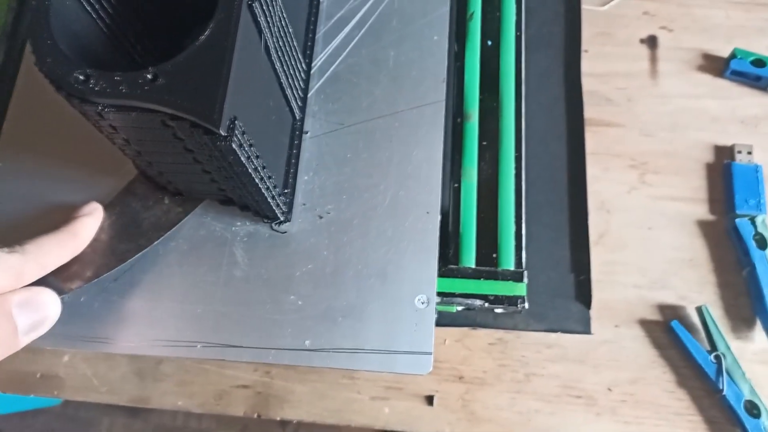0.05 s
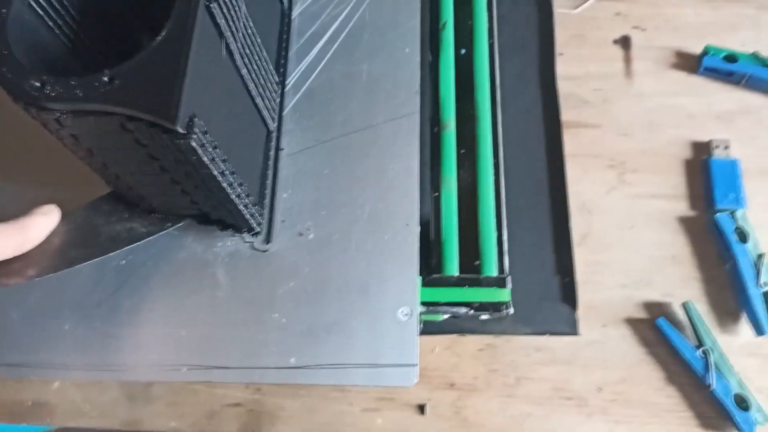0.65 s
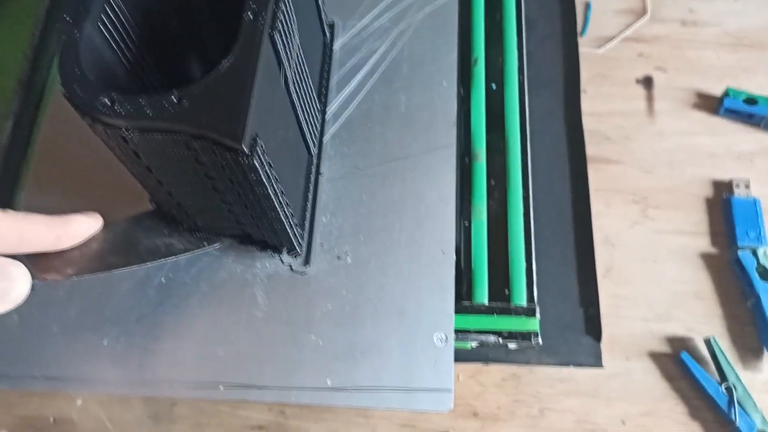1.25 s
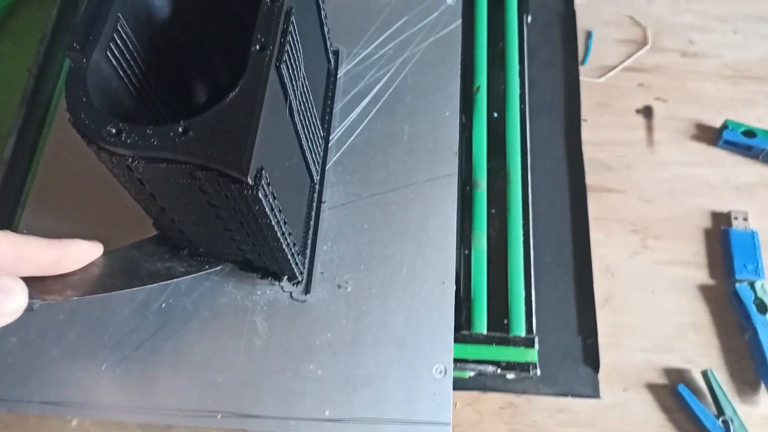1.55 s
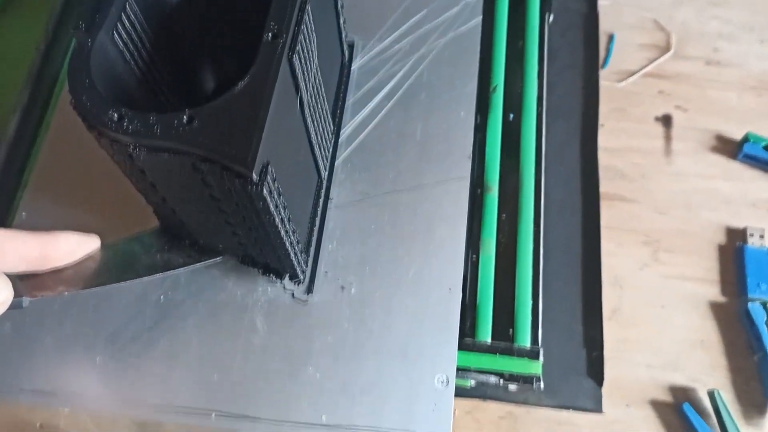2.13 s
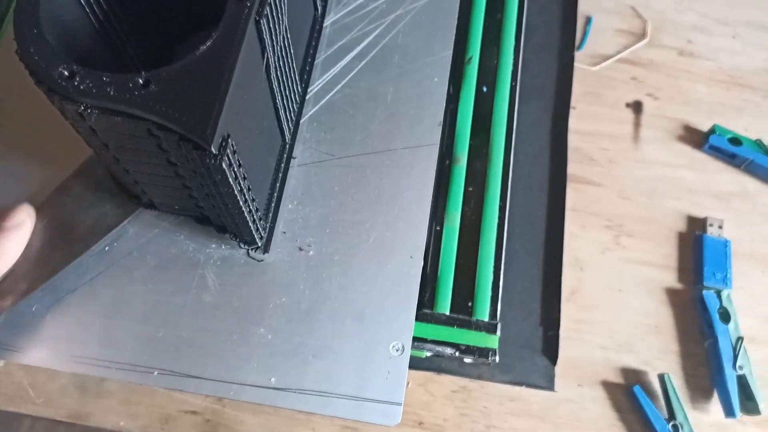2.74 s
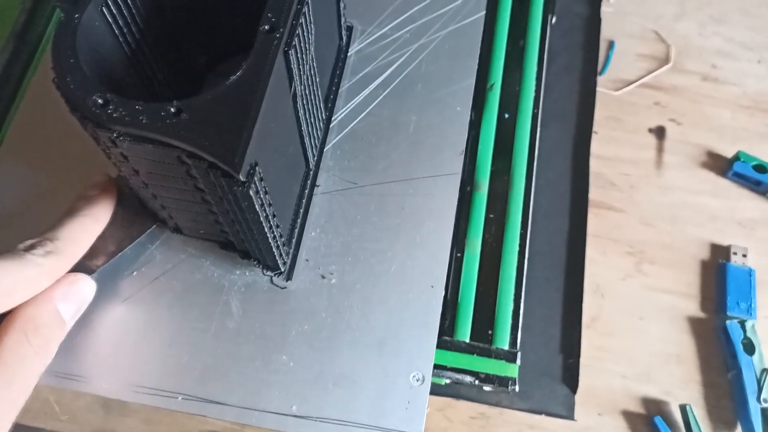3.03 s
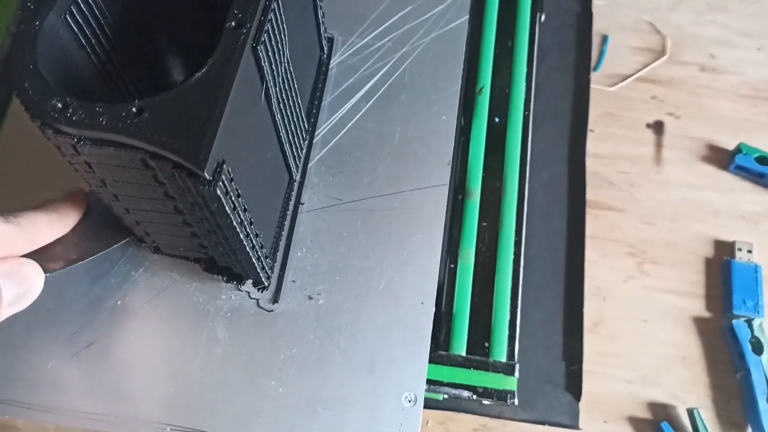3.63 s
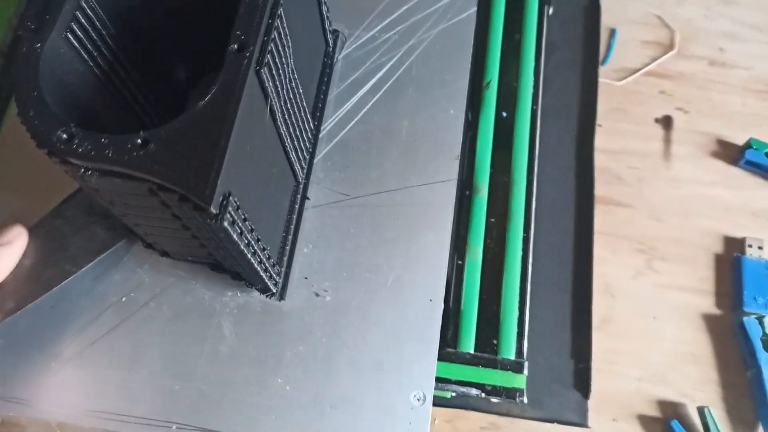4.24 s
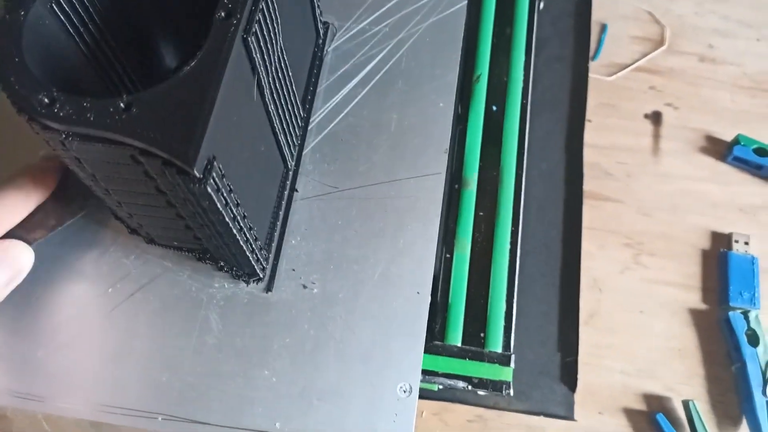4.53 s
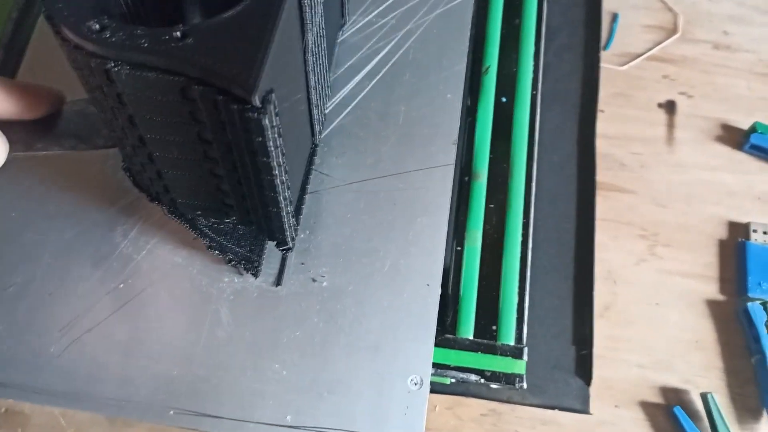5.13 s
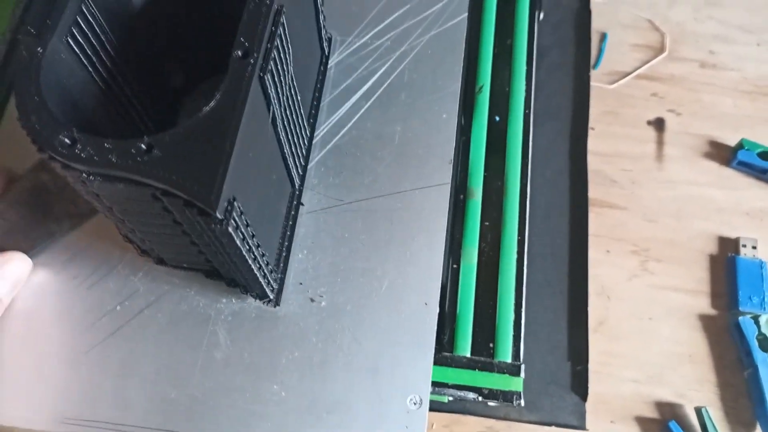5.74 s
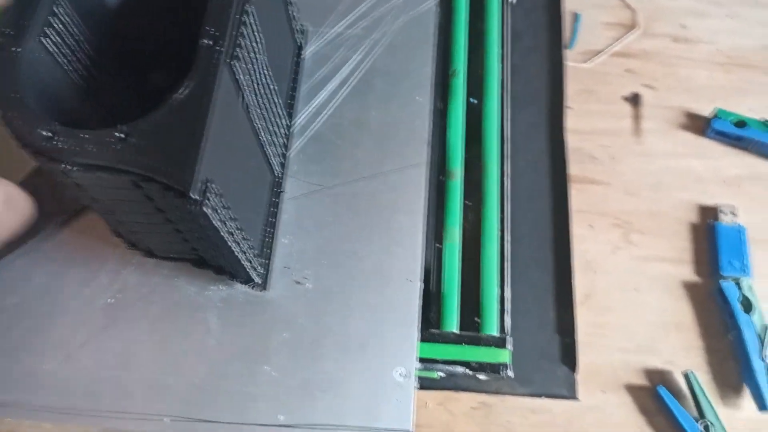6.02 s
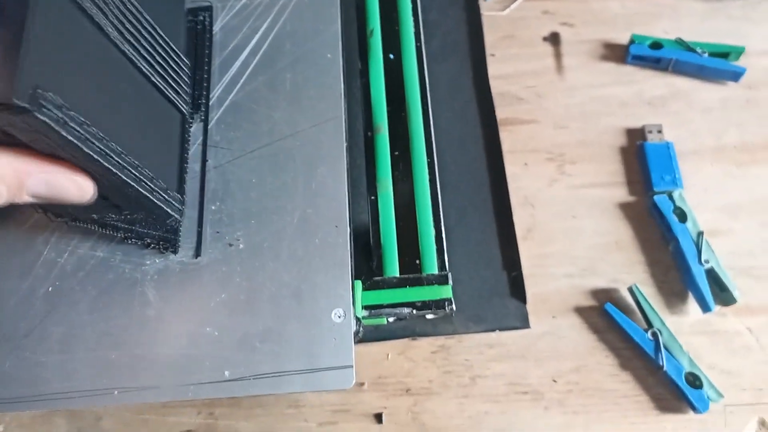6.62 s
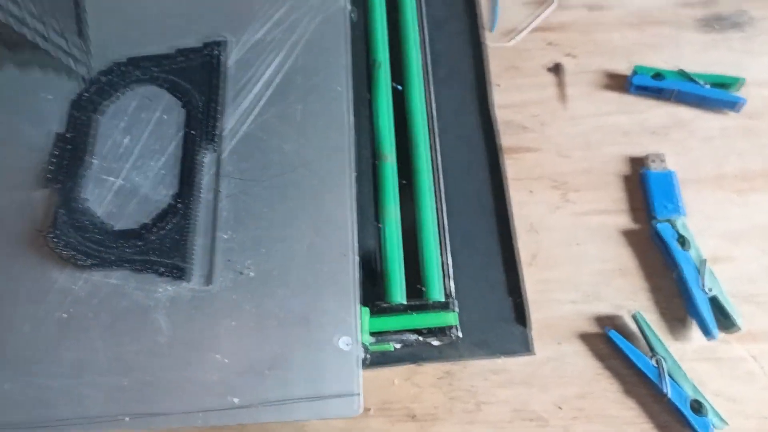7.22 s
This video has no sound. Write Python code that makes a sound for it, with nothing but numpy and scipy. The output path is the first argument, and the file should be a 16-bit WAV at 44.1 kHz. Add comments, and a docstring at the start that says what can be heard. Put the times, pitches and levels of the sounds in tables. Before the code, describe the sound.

Close up in a small room, hard plastic snaps and crackles in irregular bursts as it is levered off a metal plate. The plate knocks on a wooden bench early on, and short pings and soft scraping strokes of a steel blade fall between the cracks. Near the end a dense run of cracking frees the part, followed by a thumping metallic clatter.

```python
"""A hollow plastic part is pried off a metal plate on a wooden bench with a steel scraper, close up in
a small room. Over a fading low hum and soft taps, the bond cracks and tears, the bent plate springs
flat and knocks on the bench, and a noisy wash dies away. More cracks ring the part; the blade pings.
From 2.5 s the blade slides in strokes between cracks and tears; near 5.8 s it chatters on the plate.
From 6.3 s the cracks crowd in as a hand pulls the part free, and after 7 s the plate clatters down."""
import sys
import numpy as np
from scipy import signal
from scipy.fft import rfft, irfft, next_fast_len
from scipy.io import wavfile
from scipy.ndimage import map_coordinates

SR = 44100
rng = np.random.default_rng(int(sys.argv[2]) if len(sys.argv) > 2 else 0)


def put_to_file(sound):
    """Save the sound as 16-bit audio at rate SR, in the file named by the first command-line argument."""
    columns = np.atleast_2d(sound).T  # one column per channel
    safe = np.clip(columns, -1, 1)
    whole_steps = np.round(safe * 32767)
    wavfile.write(sys.argv[1], SR, whole_steps.astype(np.int16))


N = 329427

# single cracks of the bond, and at 5.884 s a bright clack of the scraper on the plate: t/s, body/dB, bright/dB
BOND_CRACKS = [(0.164, -40.5, -32.5), (0.361, -55, -61), (0.419, -29, -18.5), (.425, -18.5, -17),
               (.531, -40, -20), (1.104, -58.5, -61), (1.506, -52, -54.5), (1.679, -24.5, -13),
               (1.688, -41, -19.5), (1.711, -23.5, -11.5), (1.721, -26, -21), (1.754, -38, -18),
               (1.773, -53, -16), (1.867, -35.5, -17), (1.944, -21.5, -15.5), (1.986, -53, -20),
               (2.087, -72, -30), (2.202, -34, -21), (2.221, -31.5, -23), (2.327, -32, -49),
               (2.333, -44.5, -25.5), (2.368, -66, -36), (2.912, -38, -34), (3.343, -41, -26),
               (3.352, -35, -18), (3.445, -61, -45), (3.513, -35.5, -16.5), (3.58, -35.5, -35),
               (3.608, -36, -13.5), (3.674, -27, -18), (3.711, -19.5, -15), (3.75, -21.5, -14),
               (4.098, -47, -33.5), (4.166, -32, -15.5), (4.187, -35, -22), (4.207, -32, -16.5),
               (4.217, -61, -17.5), (4.274, -32.5, -22.5), (4.326, -35.5, -17.5), (4.445, -39, -24.5),
               (4.569, -36.5, -29), (4.862, -38, -31), (4.877, -34.5, -36), (4.895, -53, -24),
               (4.924, -28, -52), (4.934, -33.5, -16), (4.968, -32.5, -13.5), (4.976, -37, -23),
               (4.985, -26, -14.5), (4.999, -45, -16), (5.008, -37, -17), (5.033, -30, -15),
               (5.05, -37, -19), (5.063, -33, -27), (5.073, -29, -27), (5.082, -27, -17), (5.094, -43, -21),
               (5.111, -38.5, -18), (5.231, -67, -39), (5.286, -45, -34.5), (5.355, -30.5, -21),
               (5.366, -77, -20), (5.849, -32, -52), (5.884, -22.5, -27), (6.283, -24.5, -13),
               (6.391, -59, -31), (6.411, -37.5, -18), (6.454, -33.5, -12), (6.465, -37.5, -21),
               (6.645, -39.5, -29), (6.657, -28, -12.5), (6.687, -28, -8.5), (6.703, -34, -11.5),
               (6.75, -40, -15), (6.777, -38.5, -14), (6.855, -37, -18), (6.917, -37, -15.5),
               (6.929, -24, -18.5), (6.958, -40, -25), (6.973, -32, -14.5), (6.983, -26, -13.5),
               (7.01, -24.5, -16), (7.03, -23, -11), (7.075, -26, -13.5), (7.089, -35, -14),
               (7.158, -35, -22), (7.225, -27, -22)]
# likeness of the two channels: f/Hz, correlation
STEREO_CORRELATION = [(30, 0.27), (100, 1), (300, 0.64), (600, 0.97), (1100, 0.25), (5000, 0),
                      (12000, 0.04)]


def amp(db):
    """Decibels to gain."""
    return 10 ** (np.asarray(db) / 20)


def unit(x):
    """Scale to rms 1."""
    return x / np.sqrt(np.mean(x ** 2) + 1e-20)


def along(points, hz):
    """Read (f/Hz, value) points on a log axis."""
    f_hz, values = np.transpose(points)
    return np.interp(np.log(hz + 1), np.log(f_hz), values)


def fade(t60_s, count=SR):
    """Exponential decay, count samples long."""
    return np.exp(-np.log(1000) * np.arange(count) / SR / t60_s)


def add(track, t_s, sound):
    """Mix a sound into a track at t_s."""
    part = track[..., max(round(t_s * SR), 0):][..., :sound.shape[-1]]
    part += sound[..., :part.shape[-1]]


def filtered(x, response):
    """Apply a gain given as a function of f/Hz."""
    size = next_fast_len(N + 8192)
    return irfft(rfft(x, size) * response(np.fft.rfftfreq(size, 1 / SR)), size)[..., :N]


def stereo_gains(hz):
    """Left and right gain of the work place, at constant power."""
    # balance: f/Hz, left minus right/dB
    balance = [(50, -7.5), (120, 0.5), (400, 0.5), (700, 1.5), (1300, -4.5), (2400, -4), (4400, 5),
               (6500, 5), (9000, 6), (12000, -17.5), (15000, -1.5)]
    ratio = amp(along(balance, hz))
    return np.array([ratio, np.ones_like(ratio)]) * np.sqrt(2 / (1 + ratio ** 2))


def stereo_angle(hz):
    """Mid-side angle in radians for the channel correlation."""
    return np.arccos(np.clip(along(STEREO_CORRELATION, hz), -1, 1)) / 2


def noise(spectrum, band_hz=(0, SR), ripple_db=0, spacing_hz=130, shifts_per_s=11):
    """Coloured stereo noise, rms 1; crowded, shifting resonances ripple its spectrum."""
    hz, t_s, bins = signal.stft(rng.standard_normal((2, N)), SR, nperseg=1024)
    grid = np.meshgrid(hz / spacing_hz, t_s * shifts_per_s, indexing="ij")
    ripple = map_coordinates(rng.standard_normal((512, 256)), grid, order=1, mode="mirror")
    angle = stereo_angle(hz)
    mid, side = bins * amp(ripple_db * ripple) * np.array([np.cos(angle), np.sin(angle)])[..., None]
    pair = signal.istft(np.array([mid + side, mid - side]), SR, nperseg=1024)[1][:, :N]
    low_hz, high_hz = band_hz
    return unit(filtered(
        pair, lambda f: amp(along(spectrum, f)) * stereo_gains(f) * (f >= low_hz) * (f < high_hz)))


def ring(modes, scatter_db, detune=0):
    """Struck modes of random strength and tuning; the high ones reach the microphones out of step."""
    count = int(SR * np.clip(max(t60_s for _, _, t60_s in modes), .05, 1))
    t_s, out = np.arange(count) / SR, np.zeros((2, count))
    for hz, db, t60_s in modes:
        phase = rng.normal() * stereo_angle(hz)
        tuned_hz = hz * (1 + detune * rng.normal())
        wave = np.sin(2 * np.pi * tuned_hz * t_s + np.array([[phase], [-phase]]))
        out += stereo_gains(hz)[:, None] * amp(db + scatter_db * rng.normal()) * wave * fade(t60_s, count)
    attack = 1 - fade(0.0076, count)
    return out * attack * np.sqrt(2 / sum(amp(db) ** 2 for _, db, _ in modes))


def grain(rate_hz, depth_db):
    """Spiky random gain, rms 1."""
    wander = np.interp(np.arange(N) / SR * rate_hz, np.arange(N // 8), rng.standard_normal(N // 8))
    return unit(amp(depth_db * wander))


def background(air_db=-60):
    """Quiet room air, a low hum that wavers and fades, a few dull taps."""
    # hum: t/s, f/Hz, level/dB
    hum_track = [(0, 80, -47), (.11, 80.3, -56), (.19, 84.5, -47.5), (.34, 81.4, -59), (.75, 92.6, -68),
                 (.86, 92.2, -61), (1.18, 91.6, -61), (1.3, 95.6, -89)]
    # air: f/Hz, relative density/dB
    air_spectrum = [(15, -52), (25, -17), (108, -4.5), (344, -13), (840, -20.5), (1070, -21.5),
                    (1400, -22.5), (1610, -24), (2690, -21.5), (2910, -25), (5280, -34), (6380, -28.5),
                    (9840, -40), (12200, -27.5), (16000, -49.5)]
    # taps: t/s, level/dB
    taps = [(.005, -51), (.1, -44), (0.265, -46), (.747, -45), (.855, -50), (0.977, -48), (1.508, -48.5),
            (4.82, -45)]
    # ring of a tap: f/Hz, relative level/dB, t60/s
    tap_modes = [(233, -3.5, 0.11), (369, -2.5, 0.14), (410, 0.5, 0.046)]
    t_s = np.arange(N) / SR
    knots_s, hum_hz, hum_db = np.transpose(hum_track)
    phase = 2 * np.pi * np.cumsum(np.interp(t_s, knots_s, hum_hz)) / SR
    hum = np.sqrt(2) * amp(np.interp(t_s, knots_s, hum_db, right=-120)) * np.sin(phase)
    out = amp(air_db) * noise(air_spectrum) + hum
    for tap_s, db in taps:
        add(out, tap_s, amp(db) * ring(tap_modes, scatter_db=2, detune=.05))
    return out


def band_db(body_db, bright_db, band):
    """Level of a burst in band 0 (lowest) to 3."""
    # weight per band: 0 = body level, 1 = bright level
    bright_share = [0, .4, .6, 1]
    return body_db + bright_share[band] * (bright_db - body_db)


def bursts():
    """Cracks, contacts and runs as noise bursts that die fast. Returns direct, room send."""
    # bands: low f/Hz, high f/Hz
    bands_hz = [(350, 1800), (1800, 4000), (4000, 10000), (10000, 17000)]
    # burst per band: t60/s, gain/dB, room send/dB
    damping = [(0.03, -2.5, -6), (0.054, -5, -5.5), (0.034, -3, -10), (0.014, 0, -17)]
    # burst colour: f/Hz, relative density/dB
    spectrum = [(300, -10.5), (520, 1), (680, 3.5), (860, 3), (1250, 0), (1700, -4.5), (2400, 3),
                (3100, 1.5), (3900, -4), (5000, -4.5), (6500, 0), (8000, -5.5), (11000, -8), (12200, 3),
                (14000, -10), (16000, -14.5)]
    events = list(BOND_CRACKS) + aftershocks() + contacts() + burst_runs()
    direct, to_room = np.zeros((2, N)), np.zeros((2, N))
    for band, (t60_s, gain_db, room_db) in enumerate(damping):
        burst = (fade(t60_s, SR // 8) * (1 - fade(0.0082, SR // 8))) ** 2
        burst /= burst[:SR // 200].mean()  # unit power over the first 5 ms
        power = np.zeros(N)
        for t_s, body_db, bright_db in events:
            add(power, t_s, amp(band_db(body_db, bright_db, band) + gain_db) ** 2 * burst)
        jerks = grain(rate_hz=bands_hz[band][0] / 5, depth_db=3)  # a break advances unevenly
        sound = np.sqrt(power) * jerks * noise(spectrum, bands_hz[band], ripple_db=7.5, spacing_hz=100.23)
        direct += sound
        to_room += amp(room_db) * sound
    return direct, to_room


def after_ring(ring_db=-15):
    """Ring after each crack and contact: the part's modes, plus high microphone resonances."""
    # hollow part below 6 kHz, microphone above: f/Hz, relative level/dB, t60/s
    modes = [(797, -8, 0.9), (1195, 16.5, 0.13), (2162, 20, 0.18), (2500, -12.5, 0.27), (2550, 10, 0.21),
             (2950, -0.5, 0.11), (3366, 14.5, 0.1), (4850, -7.5, 0.093), (6460, -8.5, 0.072),
             (11500, -7.5, 0.15), (12800, -16.5, 0.074)]
    out = np.zeros((2, N))
    for t_s, body_db, bright_db in list(BOND_CRACKS) + contacts():
        gain = amp(band_db(body_db, bright_db, 1) + ring_db)
        add(out, t_s, gain * ring(modes, scatter_db=6, detune=.035))
    return out


def knocks(boom_db=-14, kick_ring_db=-17.5, thump_t60_s=0.083, jolt_t60_s=0.035):
    """The plate drops or is kicked by a crack: a dull thump, the bench's boom, the plate's ring."""
    # a crack kicks harder as the plate loosens: t/s, thump re body level/dB
    kick_thump = [(1.7, -13), (3.4, -10.5), (4.2, -4), (5.1, -8), (6.3, -6), (6.7, -6.5)]
    # wooden bench: f/Hz, relative level/dB, t60/s
    bench_modes = [(115.6, 0, 0.88), (160.8, 3, 0.74), (212, -3.5, 0.79), (246.6, -5.5, 1),
                   (297, 1.5, 0.38)]
    # metal plate: f/Hz, relative level/dB, t60/s
    plate_modes = [(406, -3.5, 0.52), (534, -9, 0.93), (619, -8.5, 0.37), (699, 4.5, 0.22),
                   (780, -18.5, 0.17), (940, -16, 0.083), (1199, 3, 0.37), (1390, -4, 0.38),
                   (1910, 3, 0.11), (2600, 6.5, 0.17), (2560, -5, .16), (3190, -4.5, 0.51),
                   (4580, 7, 0.091), (5950, -13.5, .18), (7300, -20.5, .12)]
    # the bent plate springs flat: t/s, f/Hz, level/dB
    jolts = [(0.419, 82, -23.5), (.441, 86, -12.5), (0.488, 150.4, -6.5), (.495, 251.3, -12),
             (3.751, 86.5, -25)]
    # thump: f/Hz, relative density/dB
    thump_spectrum = [(25, -31.5), (55, -13.5), (105, -0.5), (240, -1), (400, -3.5), (900, -35.5),
                      (2000, -96.5)]
    kicks = [(t_s, body_db + np.interp(t_s, *np.transpose(kick_thump)), body_db + kick_ring_db)
             for t_s, body_db, _ in BOND_CRACKS]
    push, rings = np.zeros(N), np.zeros((2, N))
    for t_s, thump_db, plate_db, *_ in kicks + bounces():
        add(push, t_s, amp(thump_db) * fade(thump_t60_s) * (1 - fade(0.048)))
        add(rings, t_s, amp(thump_db + boom_db) * ring(bench_modes, scatter_db=2, detune=.02))
        add(rings, t_s, amp(plate_db) * ring(plate_modes, scatter_db=0, detune=0.0058))
    pan = amp([[-16.5], [0]])  # jolts reach mostly the right microphone
    for t_s, hz, db in jolts:
        jolt = np.sin(2 * np.pi * hz * np.arange(SR) / SR) * fade(jolt_t60_s)
        add(rings, t_s, amp(db) * pan / pan.mean() * jolt)
    return push * noise(thump_spectrum) + rings


def pings(ref_t60_s=0.065, ref_hz=2480):
    """Flicked steel springs back and rings briefly; lower pings last longer."""
    # flicks of the blade or the plate's edge: t/s, f/Hz, level/dB
    flicks = [(.165, 824, -36.5), (.165, 2690, -35.5), (.443, 509, -26.5), (0.503, 892, -25.5),
              (1.679, 2850, -21), (1.868, 2550, -16), (1.868, 2250, -25), (1.943, 2600, -21),
              (1.988, 2300, -37), (2.088, 2370, -38), (2.842, 496, -36), (3.352, 1385, -33.5),
              (3.352, 547, -40), (3.515, 2680, -25), (3.515, 2972, -33), (3.606, 2246, -28.5),
              (3.71, 2196, -19), (4.1, 2230, -34.5), (4.161, 2540, -25.5), (5.425, 818, -37),
              (5.665, 640, -32), (6.412, 2120, -29.5), (6.856, 2140, -34.5), (7.166, 807, -17.5),
              (7.264, 750, -24), (7.327, 788, -23)]
    out = np.zeros((2, N))
    for t_s, hz, db in flicks:
        t60_s = ref_t60_s * (ref_hz / hz) ** 0.61
        add(out, t_s, amp(db) * ring([(hz, 0, t60_s)], scatter_db=4.5))
    return out


def aftershocks(mean_wait_s=.011, gain_db=-16):
    """The bond gives a little more just after each crack. Rows: t/s, body/dB, bright/dB."""
    waits_s = mean_wait_s * (.5 + rng.random(len(BOND_CRACKS)))
    return [(t_s + wait_s, body_db + gain_db, bright_db + gain_db)
            for (t_s, body_db, bright_db), wait_s in zip(BOND_CRACKS, waits_s)]


def burst_runs(spread_db=6.5, gain_db=0.5, even_above_hz=300, max_bursts=128):
    """Dense runs of tiny bursts, more even when faster. Rows: t/s, body/dB, bright/dB."""
    # 0.522-0.628 s: a noisy wash dying away after the first big break; the rest: tearing or rattling
    # start/s, end/s, burst rate/Hz, body/dB, bright/dB, fall over the run/dB
    runs = [(0.435, 0.519, 605, -25.5, -22.5, 1.5), (0.522, 0.628, 900, -32.5, -29, 13.5),
            (1.702, 1.776, 430, -29, -33.5, 16), (3.67, 3.756, 540, -32.5, -27, 4),
            (3.744, 3.853, 485, -28, -19.5, 18.5), (4.825, 4.931, 117, -56, -46, -12.5),
            (4.956, 5.12, 275, -38, -29, 16), (5.147, 5.352, 205, -68.5, -66.5, -20.5),
            (5.359, 5.44, 440, -42, -39.5, 7), (5.611, 5.821, 600, -53, -69, -2),
            (5.887, 5.983, 350, -41.5, -67, -1), (6.293, 6.517, 300, -78, -55.5, -10),
            (6.955, 7.031, 240, -44, -30, -2), (7.025, 7.092, 580, -38.5, -25, 3.5),
            (7.146, 7.28, 500, -31.5, -51.5, 3), (7.285, 7.331, 600, -22.5, -38, 1.5),
            (7.349, 7.443, 470, -32, -69, 5)]
    rows = []
    for start_s, end_s, rate_hz, body_db, bright_db, fall_db in runs:
        jitter, size = rng.random(max_bursts), rng.standard_normal(max_bursts)
        evenness = np.sqrt(max(rate_hz / even_above_hz, 1))
        count = int(np.clip((end_s - start_s) * rate_hz, 2, max_bursts))
        progress = (np.arange(count) + jitter[:count]) / count
        strength = unit(amp(spread_db / evenness * size[:count]))
        size_db = 20 * np.log10(strength) + gain_db - fall_db * progress
        rows += zip(start_s + (end_s - start_s) * progress, body_db + size_db, bright_db + size_db)
    return rows


def bounces(count=4, gap_s=.035):
    """Each drop repeats evenly, weaker each time. Rows: t/s, thump/dB, plate ring/dB, contact/dB."""
    # plate on bench, or loose part on plate: t/s, thump/dB, plate ring/dB, contact/dB, loss per bounce/dB
    drops = [(0.443, -18, -29.5, -23, 24), (0.486, -25, -41, -27, 20), (1.715, -43, -34, -24, 8),
             (1.942, -33, -39, -13, 14), (2.84, -37.5, -47, -27.5, 9.5), (3.75, -24, -42, -28, 19),
             (4.17, -49, -43, -52, 13), (4.208, -43, -49, -41, 14.5), (4.426, -52, -54, -37, 21),
             (5.286, -26, -47, -38.5, 8), (5.391, -40, -38, -32, 6), (5.602, -29, -63, -24, 12),
             (5.664, -26, -37.5, -33.5, 10.5), (5.834, -36, -35.5, -26, 14.5),
             (5.884, -40, -30.5, -20.5, 8), (7.075, -18.5, -36, -42, 3), (7.159, -10.5, -30.5, -11, 3.5),
             (7.298, -15.5, -29, -15, 11), (7.328, -18, -30, -16, 24), (7.409, -28, -30, -25.5, 16)]
    return [(t_s + k * gap_s, thump_db - k * loss_db, plate_db - k * loss_db, contact_db - k * loss_db)
            for t_s, thump_db, plate_db, contact_db, loss_db in drops for k in range(count)]


def contacts(treble_db=-19.5):
    """The clack of each bounce, duller than a crack. Rows: t/s, body/dB, bright/dB."""
    return [(t_s, db, db + treble_db) for t_s, _, _, db in bounces()]


def stroke(start_s, peak_s, end_s, db):
    """Gain of one push of the blade: it swells and fades."""
    return amp(db) * np.interp(np.arange(N) / SR, [start_s, peak_s, end_s], [0, 1, 0]) ** 1.5


def scraping(rasp_db=-2):
    """The blade rasps under the part, catching on fine ridges and coarser lumps."""
    # pushes of the blade: start/s, peak/s, end/s, level/dB
    strokes = [(2.45, 2.63, 2.72, -50), (2.684, 2.862, 3.15, -40.5), (4.327, 4.524, 4.74, -38.5),
               (5.531, 5.603, 5.63, -27.5), (6.216, 6.271, 6.3, -38.5)]
    # rasp: f/Hz, relative density/dB
    rasp_spectrum = [(240, -34), (400, -7.5), (839, 7), (1070, -5), (1420, -1.5), (1560, -11), (2510, 3),
                     (2750, -3), (3260, -1.5), (5520, -5), (9470, -9.5), (12500, 3.5), (16000, -13.5)]
    # silent layer, gain zero as its end precedes its start: start/s, peak/s, end/s, level/dB
    silent_stroke = (5.52, 5.575, 5.5, -46)
    # its narrow band at 5.25 kHz: f/Hz, relative density/dB
    silent_spectrum = [(4700, -50), (5250, 0), (5800, -45)]
    push = sum(stroke(*row) for row in strokes)
    catching = grain(rate_hz=870, depth_db=2.5) * grain(rate_hz=51, depth_db=0.5)
    rasp = amp(rasp_db) * push * noise(rasp_spectrum, ripple_db=3, spacing_hz=218, shifts_per_s=7)
    silent_layer = stroke(*silent_stroke) * noise(silent_spectrum)
    return catching * (rasp + silent_layer)


def chatter():
    """The loose scraper hits the plate and rings on."""
    # hits: t/s, level/dB
    hits = [(5.833, -38), (5.886, -19.5), (7.199, -37), (7.295, -24)]
    # steel scraper: f/Hz, relative level/dB, t60/s
    modes = [(2560, -14, 0.18), (3140, -13, 0.18), (4420, 20, 0.052), (4460, 6, 0.14), (5400, 11, 0.04),
             (5820, 19, 0.074), (6600, -43, 0.092), (6700, -47, 0.047), (8600, -66, 0.059),
             (12110, -19, .14)]
    out = np.zeros((2, N))
    for t_s, db in hits:
        add(out, t_s, amp(db) * ring(modes, scatter_db=1, detune=.01))
    return out


def room(x):
    """Small-room reverberation, with a new noise tail for each third of a second."""
    # reverberation time: f/Hz, t60/s
    decay = [(100, 0.51), (250, 0.55), (600, 0.21), (1500, 0.33), (4000, 0.41), (10000, 0.29),
             (16000, 0.46)]
    out, hop = np.zeros((2, N)), SR // 3
    for start in range(0, N, hop):
        hz, t_s, bins = signal.stft(rng.standard_normal((2, SR // 2)), SR, nperseg=256)
        envelope = np.exp(-np.log(1000) * t_s / along(decay, hz)[:, None])
        tail = signal.istft(bins * envelope, SR, nperseg=256)[1]
        tail *= 1 - fade(0.025, tail.shape[1])  # the first walls are a few milliseconds away
        tail /= np.linalg.norm(tail[0])
        add(out, start / SR, signal.fftconvolve(x[:, start:start + hop], tail, axes=1))
    return out


def scene(room_send_db=-9):
    """All the work at the plate, in its room."""
    direct, to_room = bursts()
    work = after_ring() + knocks() + pings() + chatter() + scraping()
    return direct + work + room(to_room + amp(room_send_db) * work) + background()


def record(dry, low_hz=62, top_hz=16100):
    """The recorder cuts deep bass, rounds the highest peaks and limits the band."""
    thin = signal.sosfilt(signal.butter(3, low_hz, "highpass", fs=SR, output="sos"), dry)
    rounded = thin / (1 + np.abs(thin) ** 6) ** (1 / 6)
    return filtered(rounded, lambda hz: (1 - np.tanh((hz - top_hz) / 130)) / 2)


dry = scene()
out = record(dry)
put_to_file(out)
```